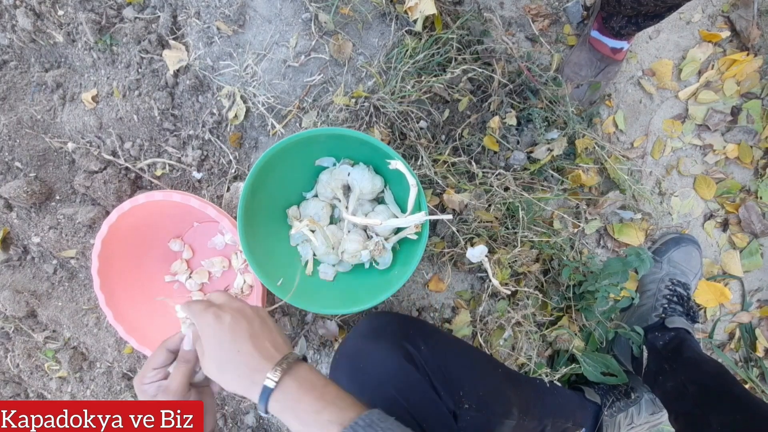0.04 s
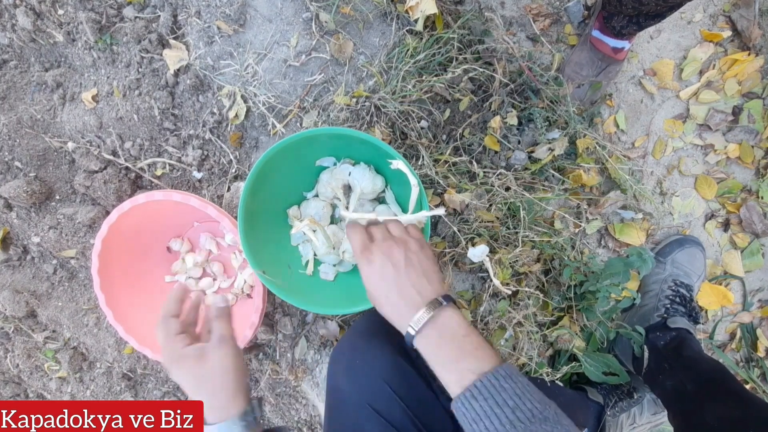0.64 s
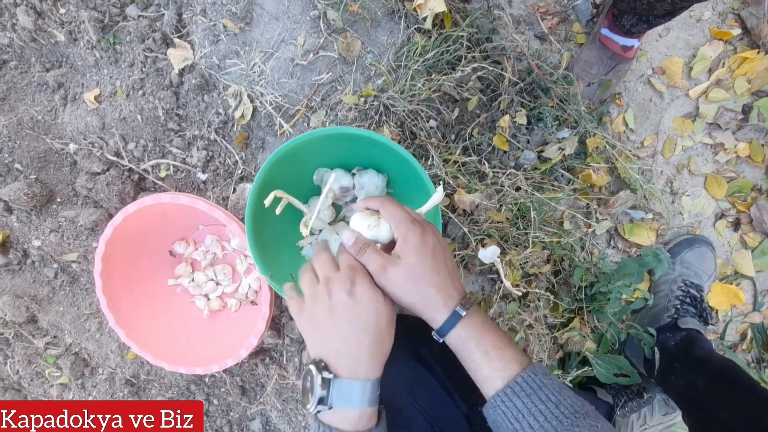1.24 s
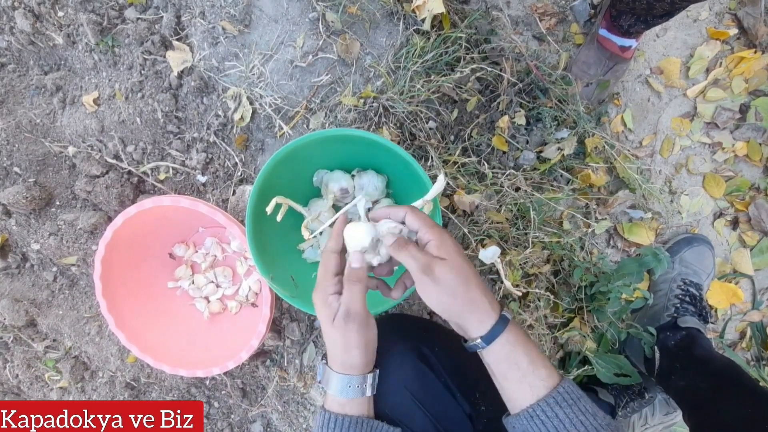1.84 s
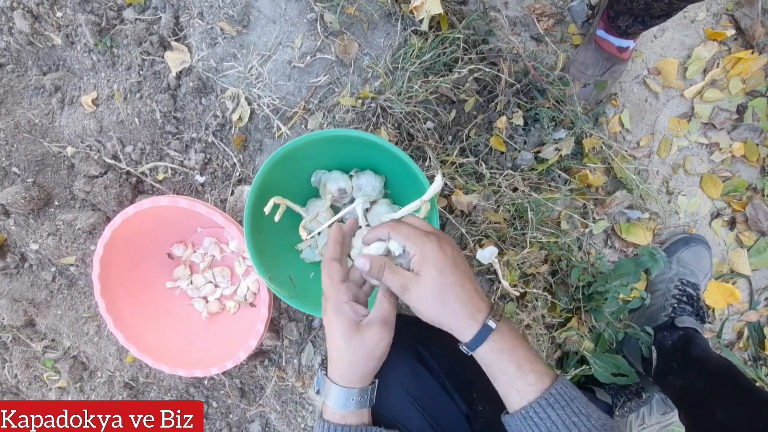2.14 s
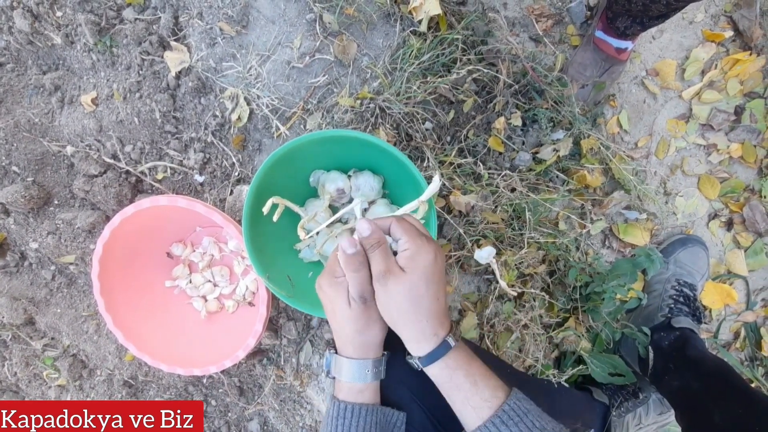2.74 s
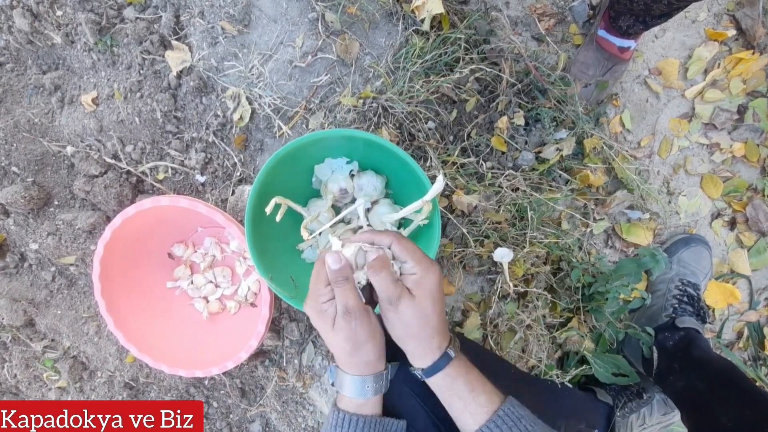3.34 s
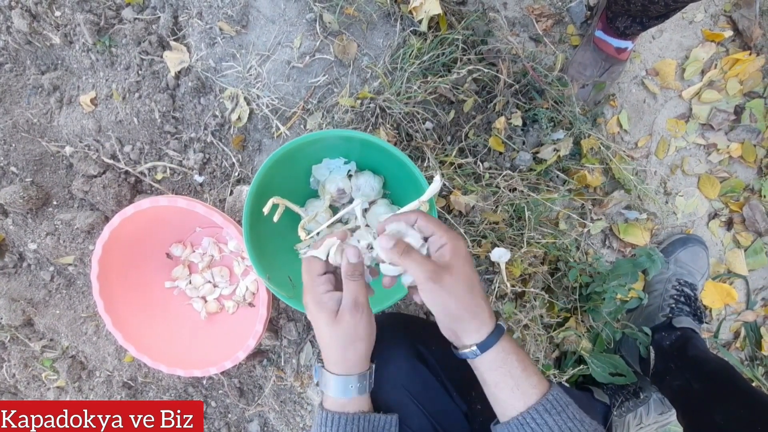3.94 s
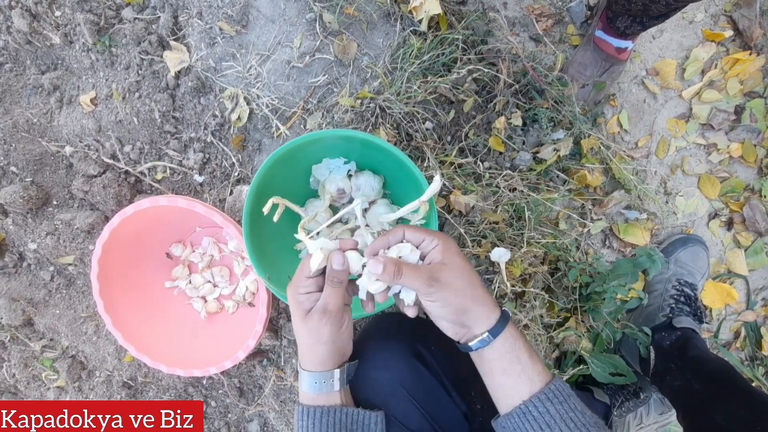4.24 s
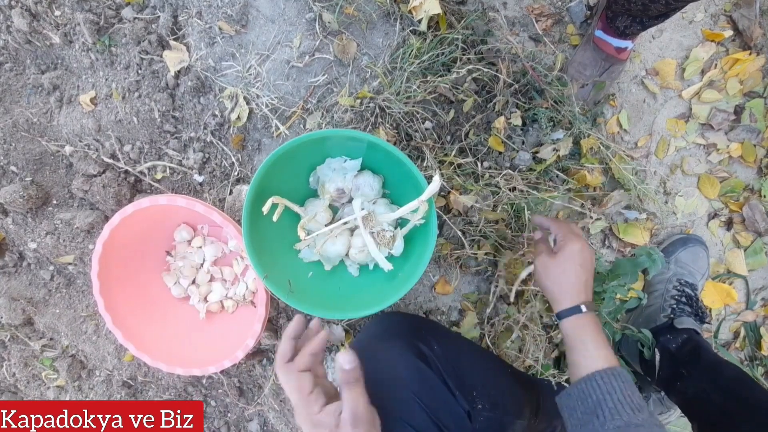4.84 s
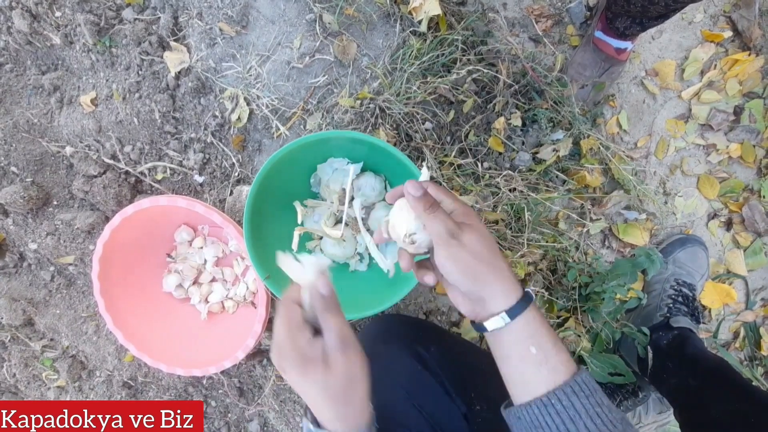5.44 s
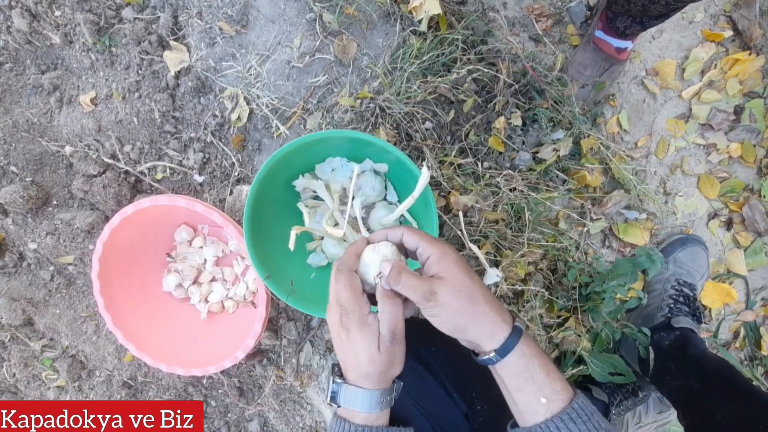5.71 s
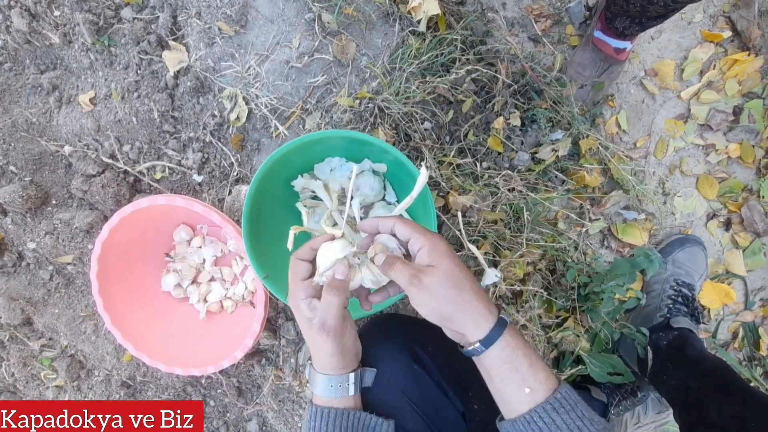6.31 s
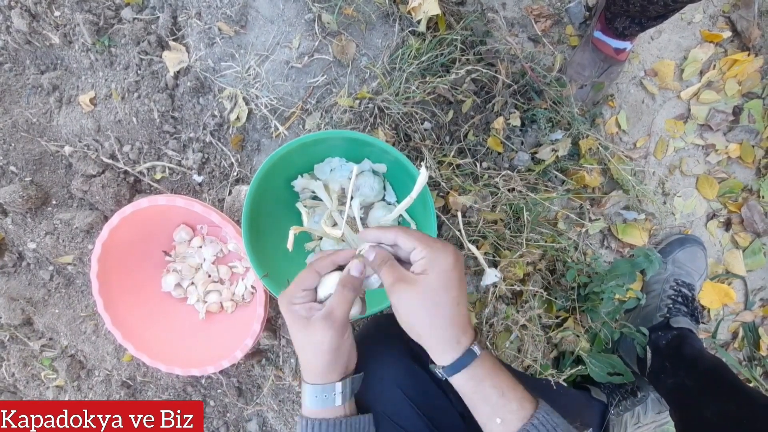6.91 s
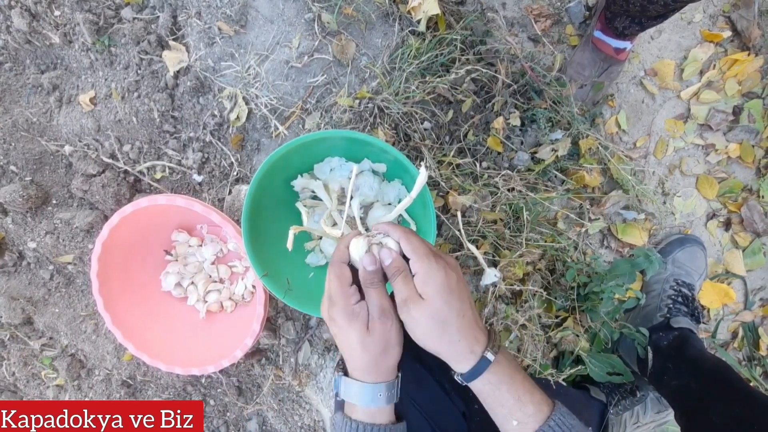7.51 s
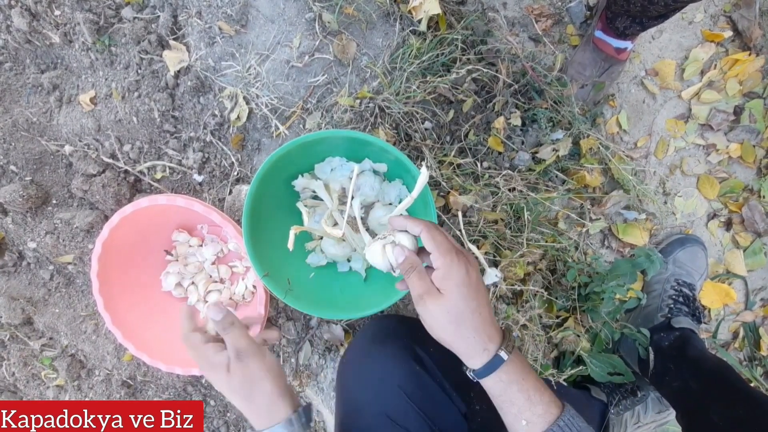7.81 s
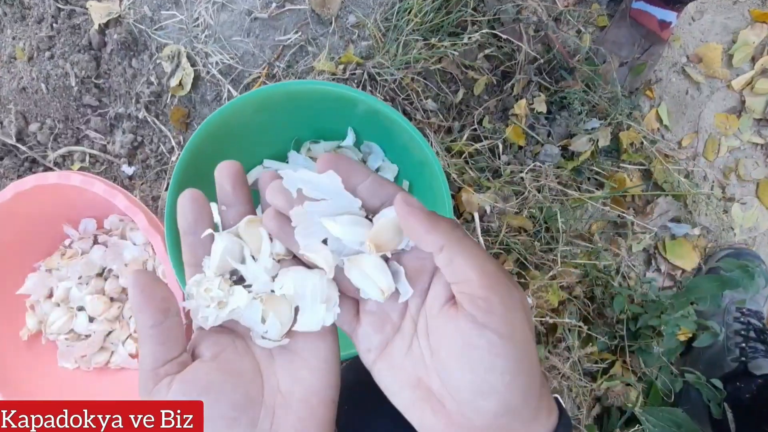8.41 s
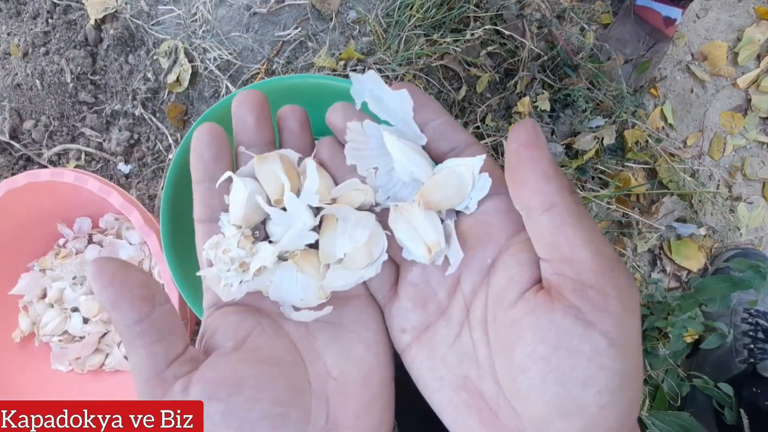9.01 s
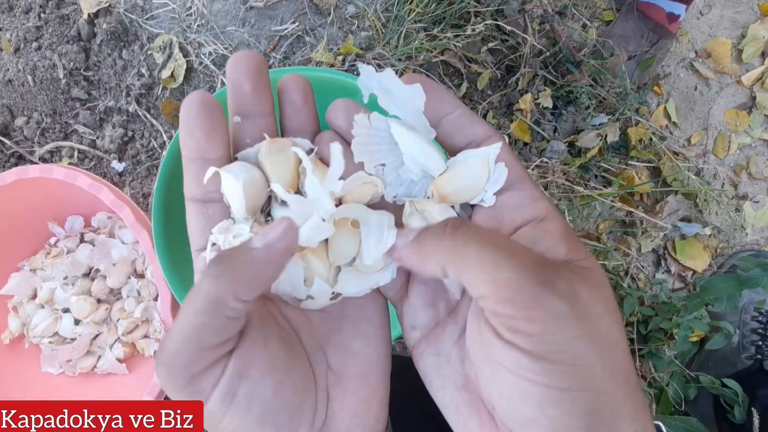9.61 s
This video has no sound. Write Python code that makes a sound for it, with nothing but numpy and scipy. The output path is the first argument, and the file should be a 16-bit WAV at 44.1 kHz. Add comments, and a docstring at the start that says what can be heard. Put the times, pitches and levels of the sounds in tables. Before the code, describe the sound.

In a very quiet garden, hands break garlic apart with papery rustling, sharp little snaps and occasional hollow taps of cloves hitting plastic.

```python
"""Dry garlic heads are broken apart by hand in an almost silent garden. From the start, friction
makes the papery skins rustle, and the microphone rumbles softly now and then. Loose cloves drop into
a plastic bowl and excite its damped modes; then a hand bumps it with dull thuds. After a second,
flakes flick off and skins snap by brittle fracture, and a far animal calls twice. Peeling and drops
go on until about 8 s; rustling, two snaps and a last bump follow. Twice all sound briefly drops out."""
import sys
import numpy as np
from scipy import signal
from scipy.fft import rfft, irfft, next_fast_len
from scipy.io import wavfile
from scipy.ndimage import map_coordinates

SR = 44100
rng = np.random.default_rng(int(sys.argv[2]) if len(sys.argv) > 2 else 0)


def store_wav(level_fs):
    """Save 16-bit WAV to argv[1]."""
    pcm = np.round(np.clip(np.atleast_2d(level_fs), -1, 1) * 32767)
    wavfile.write(sys.argv[1], SR, pcm.T.astype(np.int16))


N = 426006
TIME = np.arange(N) / SR

# spectrum of the open air: (frequency [Hz], gain [dB])
AIR_SPECTRUM = [(20, -12), (60, 4.5), (150, -6), (300, -5.5), (550, -3.5), (1000, -7.5), (2500, -22),
                (6000, -14.5), (16000, -24.5)]
# ceaseless chafing of garlic held in the hands: (time [s], level [dB])
CHAFING = [(0, -58), (.5, -61.5), (.8, -44.5), (1.55, -57), (2.3, -46), (2.63, -64), (2.9, -50), (4, -47.5),
           (4.3, -58.5), (4.85, -57), (5.03, -78.5), (5.25, -46), (5.95, -69.5), (6.5, -55.5), (7.25, -55),
           (7.85, -69.5), (8.3, -49), (8.75, -57), (9.66, -48)]
# fingers rub, twist or rummage through the skins: (start [s], duration [s], level [dB])
FINGER_STROKES = [(0.195, .04, -39.5), (0.664, 0.061, -42), (0.713, 0.1, -33), (0.876, .23, -32.5),
                  (1.18, 0.035, -45.5), (1.225, .025, -39.5), (1.339, .08, -41.5), (1.456, .025, -35.5),
                  (1.624, .06, -49), (1.786, 0.017, -30.5), (2.026, .06, -37), (2.158, .05, -39.5),
                  (2.235, .03, -33.5), (2.3, .13, -47), (2.713, .05, -44.5), (2.797, .07, -33),
                  (3.038, .05, -43.5), (3.126, .045, -33), (3.211, .035, -42.5), (3.332, 0.063, -39.5),
                  (3.412, 0.017, -39.5), (3.49, .05, -47), (3.569, .025, -37), (3.625, .035, -35),
                  (3.758, .1, -44), (3.867, .06, -35.5), (4.2, .04, -44.5), (4.37, .11, -50),
                  (4.519, .1, -44), (5.097, 0.028, -40.5), (5.115, 0.086, -31.5), (5.265, .05, -40),
                  (5.317, 0.056, -31.5), (5.402, 0.013, -23.5), (5.49, .11, -45.5), (5.685, .04, -49),
                  (5.802, .04, -51), (6.215, .07, -45.5), (6.315, 0.16, -50), (6.51, .05, -38.5),
                  (6.621, .09, -48), (6.822, .14, -45), (6.975, .025, -29.5), (7.053, .19, -39),
                  (7.424, .06, -57), (7.674, .065, -36), (7.968, .155, -32.5), (8.141, .25, -41.5),
                  (8.452, 0.12, -52), (8.93, .11, -48.5), (9.352, .08, -38), (9.55, .1, -43)]
# spectrum of the thin skin: (frequency [Hz], gain [dB])
SKIN_SPECTRUM = [(300, -63.5), (1200, -18), (2500, -12.5), (4000, -1.5), (5300, 3), (8000, 3.5), (12000, 2),
                 (16000, 4)]
# spectrum of the whole head: (frequency [Hz], gain [dB])
HEAD_SPECTRUM = [(100, -10.5), (300, -12), (550, 1), (1000, 1.5), (1700, 6), (2800, 7), (4500, -17.5),
                 (9000, -41)]
# how much the head sounds along with its skin: (time [s], gain [dB])
HEAD_COUPLING = [(0, -16.5), (.9, -10), (1.25, -15), (4.2, -15), (4.8, -9.5), (5.4, -13.5), (6.3, -10.5),
                 (7.1, -15), (8.8, -16.5), (9.66, -12.5)]
# soft swells on the microphone: (time [s], level [dB], width [s])
RUMBLE_SWELLS = [(0.013, -49, 0.07), (0.2, -46, 0.15), (0.475, -58, 0.074), (1.412, -56, 0.074),
                 (1.984, -46.5, 0.015), (2.444, -42.5, 0.061), (2.57, -47, 0.023), (2.863, -37.5, 0.031),
                 (2.953, -47.5, 0.046), (3.16, -49, 0.11), (3.268, -49, 0.028), (3.332, -43.5, 0.037),
                 (3.657, -48, 0.021), (4.241, -49.5, 0.021), (4.365, -50.5, 0.015), (5.506, -43.5, 0.049),
                 (7.209, -46, 0.092)]
# spectrum of those swells: (frequency [Hz], gain [dB])
RUMBLE_SPECTRUM = [(20, -18.5), (45, -2.5), (65, 0.5), (100, -3), (150, -14.5), (250, -31), (600, -40)]
# cloves strike the bowl: (time [s], level [dB])
CLOVE_IMPACTS = [(.213, -28), (0.2345, -15.5), (0.2558, -25), (0.297, -29.5), (0.553, -27.5), (0.566, -27),
                 (0.584, -15.5), (0.667, -20), (.6799, -23.5), (0.692, -27.5), (0.934, -38.5),
                 (1.015, -37.5), (4.764, -14.5), (4.7739, -11), (4.779, -5.5), (4.789, -15), (4.799, -8.5),
                 (4.824, -25.5), (5.129, -29), (5.1368, -13), (5.163, -32), (6.833, -26.5), (6.849, -33.5),
                 (7.3935, -16.5), (7.398, -11.5), (7.9, -14.5)]
# clear modes of the plastic bowl: (frequency [Hz], relative level [dB])
BOWL_MODES = [(155, -21), (315, -8.5), (508, -6), (565, -4), (726, -15), (828, -18.5), (1075, -14),
              (1390, -25), (2060, -30.5)]
# its many weak, crowded modes: (frequency [Hz], gain [dB])
CLATTER_SPECTRUM = [(20, -47.5), (60, -26), (190, -15), (350, -3), (560, -0.5), (830, -5.5), (1500, -3.5),
                    (4000, -20.5), (16000, -34.5)]
# a hand bumps the bowl: (time [s], level [dB])
HAND_BUMPS = [(.812, -34), (.978, -31.5), (1.09, -35.5), (9.28, -47)]
# spectrum of a bump: (frequency [Hz], gain [dB])
THUD_SPECTRUM = [(30, -19.5), (90, 4.5), (170, -7.5), (300, -4.5), (600, -7.5), (2000, -26), (16000, -80)]
# skins and stalks break: (time [s], click level [dB], tearing level [dB], ring frequency [Hz])
SKIN_BREAKS = [(1.309, -26.5, -39, 7200), (1.4002, -12.5, -31.5, 6850), (1.4093, -14, -24, 7800),
               (1.4719, -45, -31.5, 5560), (1.6903, -30, -49, 9600), (1.7758, -14.5, -25.5, 10200),
               (1.8451, -31, -31, 7740), (1.9132, -26.5, -40, 7000), (2.031, -9, -32.5, 6330),
               (2.0491, -11.5, -15.5, 7170), (2.25, -27.5, -31.5, 7700), (2.2618, -30, -28, 7860),
               (2.355, -24, -39, 6540), (2.516, -25.5, -37.5, 10400), (2.7732, -18.5, -34.5, 6350),
               (2.798, -12.5, -23.5, 7350), (2.8135, -20.5, -17, 5400), (3.1417, -22.5, -24, 4715),
               (3.1665, -20, -27, 6700), (3.3441, -27.5, -30.5, 5330), (3.421, -36, -30, 4430),
               (3.5847, -14.5, -21.5, 6600), (3.653, -23, -30, 6300), (3.7104, -29.5, -55, 13140),
               (3.889, -11, -36.5, 7600), (4.071, -34.5, -36, 10800), (4.2294, -30.5, -30, 10240),
               (4.2375, -23.5, -33, 10900), (4.9101, -41.5, -48.5, 8900), (4.998, -48, -49, 6800),
               (5.17, -22.5, -28.5, 8000), (5.3167, -22.5, -26, 7520), (5.4051, -16.5, -39.5, 5990),
               (5.4168, -15.5, -14.5, 4590), (5.4213, -17, -15, 5300), (5.8605, -25, -41, 9000),
               (6.044, -26.5, -38, 7440), (6.0629, -24.5, -31, 7000), (6.2111, -17.5, -13.5, 4996),
               (6.5258, -33, -30, 6700), (6.6045, -28.5, -59, 5840), (6.713, -21, -33.5, 8770),
               (6.9906, -19.5, -24.5, 6860), (6.9949, -40, -20.5, 7060), (7.1603, -21, -32.5, 8230),
               (7.627, -20.5, -34, 7170), (7.9511, -29, -41, 6400), (8.9897, -30, -39, 9870),
               (9.3193, -29, -61.5, 8810)]
# spectral colouring of a break: (frequency [Hz], gain [dB])
FRACTURE_SPECTRUM = [(100, -26), (500, -25.5), (1000, -16.5), (1600, -4), (3000, -4), (5500, 1.5),
                     (8000, 0.5), (12000, 2), (16000, 3)]
# a far animal calls: (time [s], pitch [Hz], level [dB])
ANIMAL_CALLS = [(1.42, 855, -57.5), (1.655, 905, -60)]
# response of the microphone ports: (frequency [Hz], gain [dB])
PORT_RESPONSE = [(20, 1.5), (8200, 3), (9100, -7), (10000, -5), (11500, 1.5), (13000, 2), (15500, 1),
                 (16300, -24.5)]
# brief silences: (start [s], end [s])
DROPOUTS = [(.367, .385), (7.957, 7.976)]


def amp(db):
    """Amplitude ratio: tenfold for every 20 dB."""
    return 10 ** (np.asarray(db) / 20)


def unit(x):
    """Normalisation to rms 1."""
    return x / np.sqrt(np.mean(x ** 2) + 1e-20)


def curve(rows):
    """Linear interpolation of (time [s], value) rows at every sample."""
    return np.interp(TIME, *np.transpose(rows))


def wobble(rate):
    """Smooth random modulation: a spline through rate knots a second."""
    return map_coordinates(rng.standard_normal(int(N * rate / SR) + 4), [TIME * rate])


def coloured(x, points):
    """Minimum-phase filtering by (frequency [Hz], gain [dB]) points."""
    size = 2 * next_fast_len(N // 2 + SR // 10)
    hz, db = np.transpose(points)
    gain = amp(np.interp(np.log(np.fft.rfftfreq(size, 1 / SR) + 1), np.log(hz), db))
    cepstrum = irfft(np.log(gain), size)
    cepstrum[1:size // 2] *= 2  # folding the cepstrum makes the filter causal
    cepstrum[size // 2 + 1:] = 0
    return irfft(rfft(x, size) * np.exp(rfft(cepstrum)), size)[..., :N]


def add(track, start, sound):
    """Superposition of a sound on the track from start [s]."""
    part = track[..., round(start * SR):][..., :sound.shape[-1]]
    part += sound[..., :part.shape[-1]]


def spread(pair, width):
    """Mid-side mixing of two independent signals: width 0 is mono, 1 uncorrelated."""
    mid, side = pair[0], width * pair[1]
    return np.array([mid + side, mid - side]) / np.sqrt(1 + width ** 2)


def stereo_noise(size, width):
    """White noise whose two channels lose correlation as width nears 1."""
    return spread(rng.standard_normal((2, size)), width)


def garden_air():
    """A nearly diffuse field of faint, mostly low noise."""
    return amp(-70.5) * unit(coloured(stereo_noise(N, width=0.92), AIR_SPECTRUM))


def rubbing_level():
    """Incoherent sources add in power: the level [dB] of chafing, strokes and stirred husks."""
    attack_s, ease_db_per_s, release_t60_s = 0.0089, 14.5, 0.11
    stir_db, stir_t60_s = -22.5, .16
    power = amp(curve(CHAFING)) ** 2
    t = np.arange(SR // 2) / SR
    for start, duration, level_db in FINGER_STROKES:
        fade_db = ease_db_per_s * t + 60 * np.maximum(t - duration, 0) / release_t60_s
        add(power, start, (np.minimum(t / attack_s, 1) * amp(level_db - fade_db)) ** 2)
    for start, level_db in CLOVE_IMPACTS:  # each clove stirs the husks it lands on
        add(power, start, amp(level_db + stir_db - 60 * t / stir_t60_s) ** 2)
    return 10 * np.log10(power)


def fibre_breaks(rate, scatter_db, width, size):
    """Shot noise: fibres break as random impulses, rate a second, scaled to rms 1."""
    happens = rng.random(size) < rate / SR
    strength = amp(scatter_db * np.clip(rng.standard_normal(size), -2, 2))
    signs = rng.choice([-1, 1], (2, size))
    return unit(spread(signs * happens * strength / np.sqrt(rate), width))


def skin_rustle(rub_db):
    """Friction drives skin and head in clumps; harder rubbing breaks more fibres a second."""
    breaks_per_s = 1500 * amp(0.78 * (rub_db + 46))
    crackle = fibre_breaks(breaks_per_s, scatter_db=3.5, width=0.85, size=N)
    sliding = amp(-0.5) * stereo_noise(N, width=0.41)
    clumping = amp(2.58 * wobble(170) + 1.17 * wobble(35))
    contact = unit((crackle + sliding) * clumping)
    skin = amp(-2.5) * unit(coloured(contact, SKIN_SPECTRUM))
    head = amp(curve(HEAD_COUPLING) - 1) * unit(coloured(contact, HEAD_SPECTRUM))
    return amp(rub_db) * (skin + head)


def hand_scattering(direct, echo_db, t60_s):
    """Early reflections from palms and bowl, ever different as the hands move."""
    t = np.arange(SR // 50) / SR
    echoes, hop = np.zeros((2, N)), SR // 20
    window = np.hanning(2 * hop)
    for i in range(0, N - 2 * hop, hop):
        tail = rng.standard_normal((2, len(t))) * amp(-60 * t / t60_s) * (t > .0002)
        tail /= np.linalg.norm(tail, axis=1, keepdims=True)
        add(echoes, i / SR, signal.fftconvolve(direct[:, i:i + 2 * hop] * window, tail, axes=1))
    return direct + amp(echo_db) * echoes


def microphone_rumble():
    """Amplitude modulation: low noise swells on the microphone, mostly at the right port."""
    swell = sum(amp(db) * np.exp(-2 * ((TIME - at) / width) ** 2) for at, db, width in RUMBLE_SWELLS)
    noise = unit(coloured(stereo_noise(N, width=1.0), RUMBLE_SPECTRUM))
    return swell * noise * amp([[-11], [2]])


def bowl_knocks():
    """Modal vibration: each clove excites a few clear modes of the plastic over a hollow clatter."""
    knock_db, clatter_db = 2.5, 1
    spot_scatter_db, detuning, lag_samples = 1.5, .015, 9
    modes, clatter, t = np.zeros(N), np.zeros((2, N)), np.arange(SR // 8) / SR
    hz, db = np.transpose(BOWL_MODES)[:, :, None]
    decay = amp(-60 * t / .035)  # the soil below and the cloves inside damp the ring
    cushion = 1 - np.exp(-t / .0014)  # the husk softens the onset
    ring_rms = np.std(decay * cushion) / np.sqrt(2)
    for start, level_db in CLOVE_IMPACTS:
        # the spot struck changes the colour of the knock, but not its energy
        strengths = amp(db + rng.normal(0, spot_scatter_db, hz.shape))
        mode_hz = hz * (1 + rng.normal(0, detuning, hz.shape))
        partials = strengths * np.sin(2 * np.pi * (mode_hz * t + rng.random(hz.shape)))
        ring = ring_rms * unit(partials.sum(axis=0) * decay * cushion)
        add(modes, start, amp(level_db + knock_db) * ring)
        add(clatter, start, amp(level_db + clatter_db) * stereo_noise(len(t), width=0.24) * decay)
    left, right = modes + coloured(clatter, CLATTER_SPECTRUM)
    # the bowl stands to the left, so its sound reaches the right port later
    return np.array([left, np.roll(right, lag_samples)])


def bowl_bumps():
    """Soft impact: a hand meets the loaded bowl and excites mainly low frequencies."""
    rise_s, t60_s = 0.0055, 0.06
    envelope, t = np.zeros(N), np.arange(SR // 5) / SR
    for start, level_db in HAND_BUMPS:
        add(envelope, start, amp(level_db - 60 * t / t60_s) * (1 - np.exp(-t / rise_s)))
    return envelope * unit(coloured(rng.standard_normal(N), THUD_SPECTRUM))


def flake_ticks(rub_db):
    """Impulse excitation: single flakes flick off during peeling, louder under harder rubbing."""
    count, peel_from_s, peel_to_s = 330, 1.15, 7.9
    db_per_rub_db, offset_db, range_db = 0.72, 3, 13.5
    when, side, strength = rng.random((count, 3)).T
    at = ((peel_from_s + (peel_to_s - peel_from_s) * when) * SR).astype(int)
    level_db = db_per_rub_db * rub_db[at] + offset_db + range_db * strength ** 2
    impulses = np.zeros((2, N))
    impulses[0, at] = amp(level_db + 6.7 * (side - 1.0))
    impulses[1, at] = amp(level_db - 2 * (side - .5))
    return coloured(impulses, SKIN_SPECTRUM)


def skin_snaps():
    """Brittle fracture: a dry layer gives way with a ringing click, then a dying run of tearing fibres."""
    ring_t60_s, crack_t60_s, tear_t60_s = 0.0021, .0012, 0.028
    snaps, t = np.zeros((2, N)), np.arange(SR // 10) / SR
    octaves = np.log2(np.clip(np.fft.rfftfreq(len(t), 1 / SR), 1500, 12000) / 5500)
    tear_envelope = amp(-60 * t / tear_t60_s) * (1 - np.exp(-t / 0.0004))
    for start, click_db, tear_db, hz in SKIN_BREAKS:
        lag_s = rng.normal(0, .000016)  # the break lies a little to one side
        age = np.maximum(t + np.array([[lag_s], [-lag_s]]), 0)
        ring = np.sin(2 * np.pi * hz * age) * amp(-60 * age / ring_t60_s) * (1 - np.exp(-age / .0001))
        crack = stereo_noise(len(t), width=0.47) * amp(-60 * t / crack_t60_s)
        tear = fibre_breaks(rate=6400, scatter_db=10, width=0.18, size=len(t)) * tear_envelope
        snap = amp(click_db) * (amp(7.0) * ring + amp(4.0) * crack) + amp(tear_db + 2.5) * tear
        tilt_db_per_octave = 4.7 * np.log2(hz / 7000)  # thick, low-pitched parts sound duller
        add(snaps, start, irfft(rfft(snap) * amp(tilt_db_per_octave * octaves), len(t)))
    return coloured(snaps, FRACTURE_SPECTRUM)


def far_calls():
    """A far animal gives two almost pure tones with slight frequency modulation."""
    pitch_hz = curve(np.array(ANIMAL_CALLS)[:, :2]) * (1 + 0.0054 * wobble(60.4))
    swell = sum(amp(db) * np.exp(-((TIME - at) / 0.022) ** 2) for at, _, db in ANIMAL_CALLS)
    return swell * np.sin(2 * np.pi * np.cumsum(pitch_hz) / SR)


def scene():
    """All sources superpose; level and time differences place the hands a little to the right."""
    rub_db = rubbing_level()
    rubbed = hand_scattering(skin_rustle(rub_db), echo_db=-1.0, t60_s=0.014)
    broken = hand_scattering(skin_snaps() + flake_ticks(rub_db), echo_db=-7, t60_s=.008)
    left, right = (rubbed + broken) * amp([[-.5], [.5]])
    garlic = np.array([np.roll(left, 1), right])
    return garlic + bowl_knocks() + bowl_bumps() + microphone_rumble() + garden_air() + far_calls()


def record(dry):
    """Filtering and gating: the ports notch the treble, the sound drops out twice, the band is limited."""
    cutoff_hz = 16200
    sound = coloured(dry, PORT_RESPONSE)
    for start, end in DROPOUTS:
        sound = sound * ((TIME < start) | (TIME > end))
    size = next_fast_len(N + SR // 10)
    passband = np.fft.rfftfreq(size, 1 / SR) < cutoff_hz
    return irfft(rfft(sound, size) * passband, size)[:, :N]


dry = scene()
out = record(dry)
store_wav(out)
```